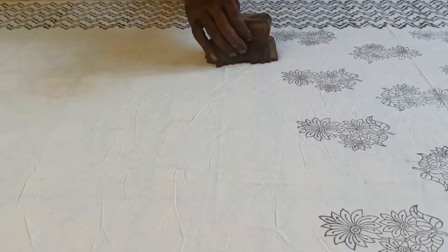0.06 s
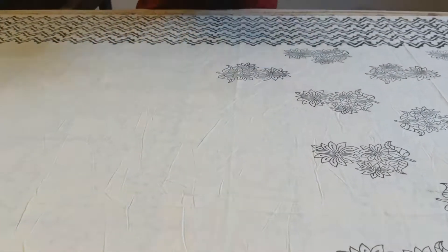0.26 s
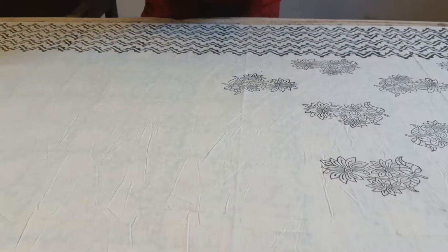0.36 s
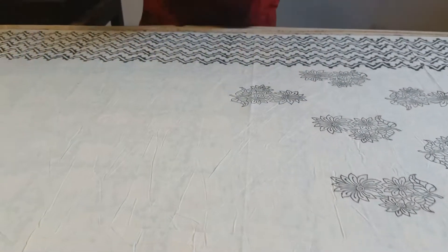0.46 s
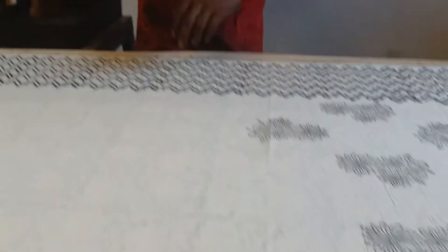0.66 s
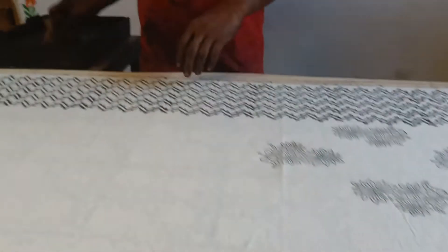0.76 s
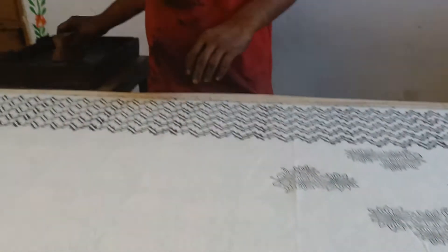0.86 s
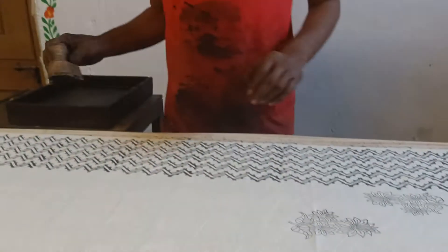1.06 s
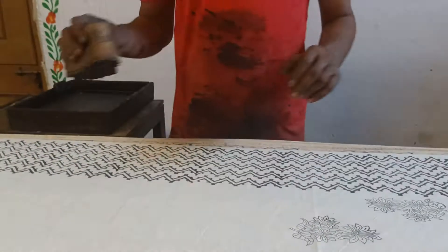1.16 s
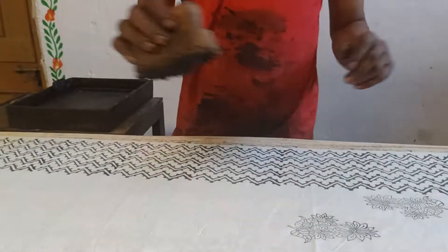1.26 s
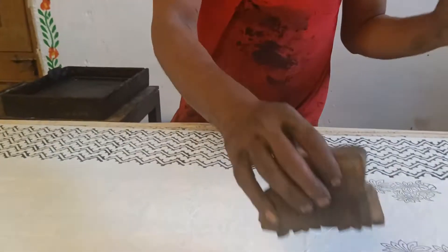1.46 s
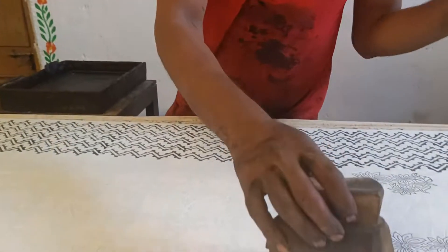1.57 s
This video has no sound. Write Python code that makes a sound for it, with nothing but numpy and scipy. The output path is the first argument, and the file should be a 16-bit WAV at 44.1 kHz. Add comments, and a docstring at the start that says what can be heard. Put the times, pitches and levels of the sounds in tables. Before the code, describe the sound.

The boom of an earlier blow fades, then a wooden block lands hard on a cushioned table, its low resonance dying away under sliding cloth before a sharp tray knock and brief scrape, in a quiet, echoing room.

```python
"""The boom of a blow fades over a low room hum; then a wooden printing block is thumped onto a padded table.
Damped modes make the table top boom, and decaying bands of noise carry the boom on in the room.
Cloth slides and hisses, mostly to the right in the treble: shaped noise that follows one movement.
The block taps, knocks, rattles, cracks and scrapes on the ink tray: damped modes with a room echo."""
import sys
import numpy as np
from scipy import signal
from scipy.fft import rfft, irfft
from scipy.io import wavfile
from scipy.ndimage import uniform_filter1d

SR = 44100
rng = np.random.default_rng(int(sys.argv[2]) if len(sys.argv) > 2 else 0)


def master_out(mix):
    """Clip the mix to full scale and print it as 16-bit PCM to the path in sys.argv[1]."""
    frames = np.transpose(np.atleast_2d(mix))
    ceiling = np.clip(frames, -1, 1)
    pcm = np.round(ceiling * 32767).astype(np.int16)
    wavfile.write(sys.argv[1], SR, pcm)


def level_to_linear(level):
    """Convert decibel levels to linear amplitude factors, elementwise."""
    exponent = np.asarray(level, float) / 20
    return 10 ** exponent


N = 70560  # samples


def interp_log_hz(points):
    """Bin frequencies in Hz and the (Hz, dB) curve read there as gains, along log frequency."""
    p = np.array(points, float)
    hz = np.maximum(np.fft.rfftfreq(N, 1 / SR), 1)
    return hz, level_to_linear(np.interp(np.log(hz), np.log(p[:, 0]), p[:, 1]))


def shaped(points, channels=1):
    """Noise with a (Hz, dB) spectrum, scaled to rms 1."""
    _, gain = interp_log_hz(points)
    y = irfft(rfft(rng.standard_normal((channels, N))) * gain, N)
    return y / np.sqrt(np.mean(y ** 2))


def band(hz, width=1.57):
    """Stereo noise from hz / width to hz * width; the channels grow more alike towards the bass."""
    apart_per_100hz = 0.097
    spectrum = [(hz / 8, -120), (hz / width, 0), (hz * width, 0), (hz * 8, -140)]
    mid, side = shaped(spectrum, channels=2)
    return mid + min(apart_per_100hz * hz / 100, 1) * side * np.array([[1], [-1]])


def walk(rate_hz):
    """Random levels, rate_hz per second, joined by straight slews."""
    k = int(SR / rate_hz)
    return uniform_filter1d(np.repeat(rng.standard_normal(N // k + 1), k), k)[:N]


def ring(modes, start_s, push_ms, swell_s=.0001, size=1):
    """Damped modes, sign alternating in groups of size, smeared by a half-sine push from start_s."""
    t = np.maximum(np.arange(N) / SR - start_s, 0)
    free = 0
    for k, (hz, db, t60_s) in enumerate(modes):
        decay = np.exp(-np.log(1000) * t / t60_s)
        free = free + (-1) ** (k // size) * level_to_linear(db) * np.sin(2 * np.pi * hz * t) * decay
    # 600 samples: a push is cut off at 13.6 ms
    push = np.sin(np.pi * np.clip(np.arange(600) / SR * 1000 / push_ms, 0, 1))
    return signal.fftconvolve(free * (1 - np.exp(-t / swell_s)), push / push.sum())[:N]


# Room hum spectrum. Each row: frequency in Hz, relative level in dB.
HUM_SPECTRUM = [(15, -61), (25, -23), (76, -1), (195, 2.5), (405, -22), (439, -15.5), (1440, -25),
                (2220, -32.5), (3080, -24.5), (6050, -42.5), (16000, -54.5)]
HUM_DB = -60


def hum():
    """Quiet room noise of fixed spectrum, wavering in level, nearly alike in both channels."""
    mid, side = shaped(HUM_SPECTRUM, channels=2)
    return level_to_linear(HUM_DB + 0.83 * walk(9.6)) * (mid + 0.19 * side * np.array([[1], [-1]]))


# Cloth movement. Each row: time in seconds, level in dB, low rustle and top sheen in dB against the level.
CLOTH_MOVES = [(0, -60, -4, -22), (.04, -65, -6, -19), (.146, -76, -3, -14), (.186, -70, 4, -14),
               (.205, -60, -6, -3), (.24, -53, -2, -11), (.284, -44, -5, -13), (.342, -44, -7, -14),
               (.4, -49, -12, -18), (.458, -41, -17, -12), (.502, -39, -17, -14), (.606, -44, -16, -12),
               (.654, -52, -4, -22), (.738, -62, 0, -21), (.796, -70, -3, -18), (.864, -62, -12, -11),
               (.944, -58, -8, -17), (.954, -50, -14, -13), (.984, -51, -14, -12), (1.038, -46, -16, -14),
               (1.086, -51, 2, -22), (1.125, -50, 2, -16), (1.238, -50, -5, -15), (1.335, -48, -10, -18),
               (1.4, -57, -8, -17), (1.474, -70, -3, -14), (1.6, -69, -6, -13)]
# Hiss spectrum. Each row: frequency in Hz, relative level in dB.
HISS_SPECTRUM = [(710, -15), (1200, -36.5), (1360, -54), (1640, -26), (1770, -30.5), (1890, -11.5),
                 (2110, -8.5), (3650, -3), (3940, -0.5), (5520, -3.5), (6210, 0.5), (8000, -18.5),
                 (9000, -17.5), (11700, -49), (19800, -120)]
# Sheen spectrum. Each row: frequency in Hz, relative level in dB.
SHEEN_SPECTRUM = [(4710, -21), (8000, -2), (9770, -3.5), (13900, -2.5), (16000, -13)]
# Place of hiss and sheen. Each row: frequency in Hz, left over right in dB.
CLOTH_BALANCE = [(60, -4.5), (110, 0.0), (200, 12.5), (380, 25), (700, -14), (1290, -62), (2380, -14),
                 (4400, -22.5), (8120, -9), (15000, -17.5)]
HISS_DB, SHEEN_DB, RUSTLE_DB = 1, 3, -0.5  # gains of the layers
RUSTLE_HZ, CLOTH_FLICKER_DB = 1800, .7
CLOTH_APART, CLOTH_LAG_S = 1.14, 0.0002784  # the left microphone hears it later


def cloth():
    """Friction noise: sliding hiss, its top sheen and a duller rustle follow the same movement."""
    t, moves = np.arange(N) / SR, np.array(CLOTH_MOVES)
    level, low, top = (np.interp(t, moves[:, 0], moves[:, k]) for k in (1, 2, 3))
    level = level + CLOTH_FLICKER_DB * walk(30.2)
    hiss = shaped(HISS_SPECTRUM, channels=2) * level_to_linear(level + HISS_DB)
    sheen = shaped(SHEEN_SPECTRUM, channels=2) * level_to_linear(level + top + SHEEN_DB)
    mid, side = hiss + sheen
    pair = mid + CLOTH_APART * side * np.array([[1], [0]])
    hz, balance = interp_log_hz(CLOTH_BALANCE)
    left = balance * np.exp(-2j * np.pi * hz * CLOTH_LAG_S)
    placed = irfft(rfft(pair) * 2 * np.array([left, np.ones(len(hz))]) / (1 + balance), N)
    rustle = band(RUSTLE_HZ) * level_to_linear(level + low + RUSTLE_DB + 1.1 * walk(41.15))
    return placed + rustle * level_to_linear(np.array([[-2.5], [2.5]]))


# Wood on wood. Each row: start in seconds, level in dB, push length in ms, left over right in dB.
KNOCK_TIMES = [(0.162, -49.5, 1.12, 7), (.645, -51, 0.4, 4), (.665, -55.5, 0.27, -12),
               (1.042, -60, 0.1, 29), (1.063, -22.5, 1.83, 0), (1.079, -35.5, 0.41, 0)]
# Block and tray modes. Each row: frequency in Hz, level in dB, t60 in seconds.
WOOD_MODES = [(217.4, 4.5, 0.011), (346, 3, 0.017), (490, -6.5, 0.055), (573.5, -2, 0.088),
              (797, -1, 0.063), (900, -12.5, 0.12), (1101, 3.5, 0.0374), (1594, -15, 0.017),
              (1710, -19.5, 0.016), (2480, 0, 0.024)]


def knocks():
    """Each knock pushes the modes of block and tray, at its own place between left and right."""
    out = 0
    for start_s, db, push_ms, pan_db in KNOCK_TIMES:
        out = out + level_to_linear(db) * ring(WOOD_MODES, start_s, push_ms) * level_to_linear(np.array([[pan_db], [-pan_db]]) / 2)
    return out


# Light rattle. Each row: start in seconds, level in dB.
CLACK_TIMES = [(.9168, -39), (.9205, -44), (.9262, -42), (.953, -51)]
# Modes of the small part. Each row: frequency in Hz, level in dB, t60 in seconds.
CLACK_MODES = [(526, -29, 0.66), (691, -1, 0.039), (1032, -1, 0.016), (1241, 2, 0.036), (1842, -12, 0.11),
               (2306, -12, 0.059), (2870, -32, 0.022)]


def clacks():
    """A small wooden part rattles: short pushes on its modes, 3 dB louder on the left."""
    mono = sum(level_to_linear(db) * ring(CLACK_MODES, start_s, 0.14) for start_s, db in CLACK_TIMES)
    return mono * level_to_linear(np.array([[1.5], [-1.5]]))


# Dry cracks of the block's edge. Each row: start in seconds, level in dB, push length in ms.
CRACK_TIMES = [(.2248, -30.5, 0.25), (.3225, -22.5, 1), (1.0604, -27, .12), (1.116, -41, 0.061),
               (1.121, -37, 0.096), (1.13, -44.5, .15)]
# Their short ring. Each row: frequency in Hz, level in dB, t60 in seconds.
CRACK_MODES = [(710, 0.5, 0.022), (997, 2.5, 0.01), (1600, 5, 0.0043), (2526, -11.5, 0.03),
               (3620, -2.5, 0.0096)]


def cracks():
    """The block's edge cracks: pushes on fast-dying modes."""
    return sum(level_to_linear(db) * ring(CRACK_MODES, start_s, push_ms) for start_s, db, push_ms in CRACK_TIMES)


SCRAPE_S, SCRAPE_LEN_S, SCRAPE_COUNT = 1.085, .1, 16
SCRAPE_MIN_DB, SCRAPE_SPREAD_DB, SCRAPE_PUSH_MS = -55.5, 2, 0.22


def scrape():
    """The block drags over the tray edge: small knocks at random times and levels, without the lowest mode."""
    out = 0
    for when, force in rng.random((SCRAPE_COUNT, 2)):
        knock = ring(WOOD_MODES[1:], SCRAPE_S + when * SCRAPE_LEN_S, SCRAPE_PUSH_MS)
        out = out + level_to_linear(SCRAPE_MIN_DB + SCRAPE_SPREAD_DB * force) * knock
    return out


WOOD_ROOM_DB, WOOD_ROOM_T60_S, WOOD_ROOM_RISE_S = -7, 0.43, 0.0033


def wood():
    """All wood sounds and their room echo, a convolution with decaying stereo noise."""
    direct = knocks() + clacks() + cracks() + scrape()
    t = np.arange(N // 2) / SR
    decay = np.exp(-np.log(1000) * t / WOOD_ROOM_T60_S)
    room = rng.standard_normal((2, N // 2)) * decay * np.clip(t / WOOD_ROOM_RISE_S, 0, 1)
    return direct + level_to_linear(WOOD_ROOM_DB) * signal.fftconvolve(direct, room / 30, axes=1)[:, :N]


# The block meets the cloth. Each row: start in seconds, level in dB.
TICK_TIMES = [(0.2255, -23)]
# Ring of the tick. Each row: frequency in Hz, level in dB, t60 in seconds.
TICK_MODES = [(4060, -12.5, 0.024), (6380, 13, 0.0025), (7410, 14, 0.0017), (11350, 5, 0.0019),
              (12000, -12, .004), (15470, -5, .004)]


def ticks():
    """Dry tick of the block on the cloth: a very short push on high modes."""
    return sum(level_to_linear(db) * ring(TICK_MODES, start_s, 0.042, 0.00024) for start_s, db in TICK_TIMES)


# Blows on the padded table. Each row: start in seconds, level in dB, push length in ms.
THUMP_TIMES = [(-.04, -21.5, 2.14), (0.205, -19, 9.3), (.215, -14.5, 5.7), (0.2246, -6.5, 2.135),
               (.237, -18.5, 1.66), (.258, -14.5, 4.3), (.288, -14, 2.36), (0.431, -27, 6.9),
               (0.762, -46, 5.3), (1.111, -43.5, 23), (1.352, -55.5, 3.7), (1.441, -63, 4)]
# Table top modes. Each row: frequency in Hz, level in dB, t60 in seconds.
TABLE_MODES = [(36.9, -4.5, 0.33), (53.2, -17, .5), (63.5, -8.5, 0.3), (102, 1, 0.39), (114.2, -6.5, 0.35),
               (124.8, 2.5, 0.18), (140, -19.5, .25), (168.75, -11.5, 0.44), (188.67, -13.5, 0.93),
               (231, -45, 0.9), (256.5, -7, 0.11), (308, -16, 0.26), (342.4, -37, 0.29), (458, -66, .2),
               (640, -3, 0.33)]
TABLE_SWELL_S = 0.004  # the padding spreads the blow


def table_top():
    """Each blow pushes the damped modes of the table top."""
    return sum(level_to_linear(db) * ring(TABLE_MODES, start_s, push_ms, TABLE_SWELL_S, size=3)
               for start_s, db, push_ms in THUMP_TIMES)


# Room tail after a blow, by band. Each row: centre in Hz, level in dB, t60 in seconds.
TAIL_BANDS = [(40, -56, 0.8), (59.7, -46, 0.23), (97.6, -7.5, 0.93), (167.3, -8.5, 0.85),
              (299, -18.5, 0.53), (467, -17, 0.37), (840, -15.5, 0.38), (1500, -11, 0.35)]
TAIL_RISE_S = 0.0067


def table_tail():
    """Each blow feeds decaying noise bands, the room's tail; long pushes feed it less treble."""
    t = np.arange(N) / SR
    out = 0
    for hz, tail_db, t60_s in TAIL_BANDS:
        power = 0
        for start_s, db, push_ms in THUMP_TIMES:
            feed = level_to_linear(db) / (1 + (hz * push_ms / 1000) ** 3)
            rise = np.clip((t - start_s) / TAIL_RISE_S, 0, 1)
            power = power + (feed * rise) ** 2 * np.exp(-2 * np.log(1000) * (t - start_s) / t60_s)
        out = out + level_to_linear(tail_db) * np.sqrt(power) * band(hz, 1.204)
    return out


def scene():
    """All sources at the microphones."""
    return hum() + cloth() + wood() + ticks() + table_top() + table_tail()


def roll_off(x):
    """The treble ends steeply here."""
    return signal.sosfilt(signal.butter(12, 16470, fs=SR, output="sos"), x)


CEILING = .9  # of full scale


def record(dry):
    """The phone rounds the loudest peaks under its ceiling."""
    rounded = dry / (1 + np.abs(dry / CEILING) ** 4) ** .25
    return roll_off(rounded)


dry = scene()
out = record(dry)
master_out(out)
```